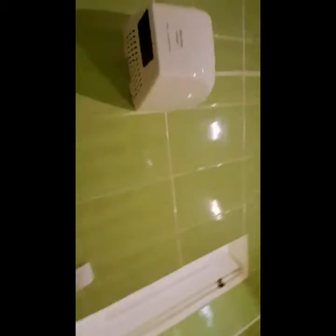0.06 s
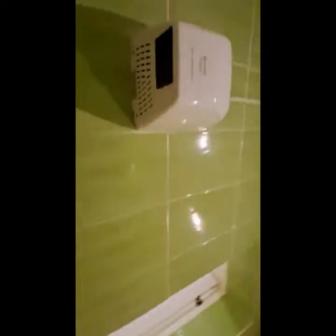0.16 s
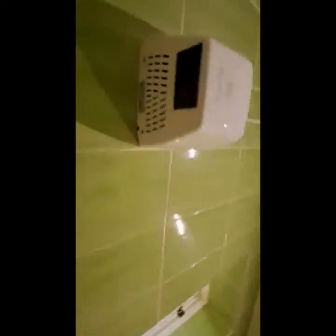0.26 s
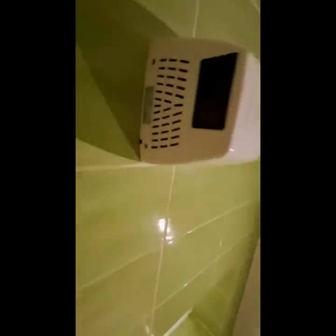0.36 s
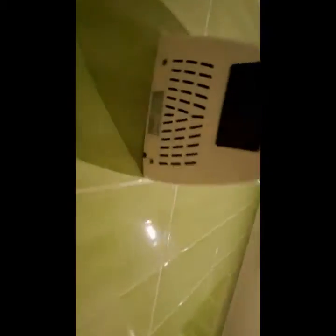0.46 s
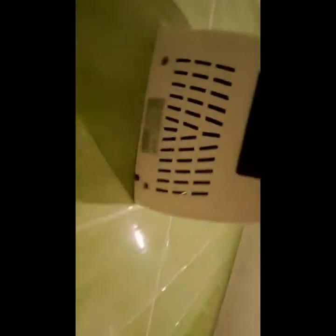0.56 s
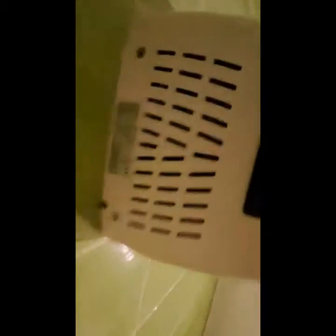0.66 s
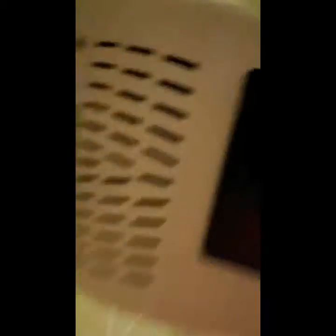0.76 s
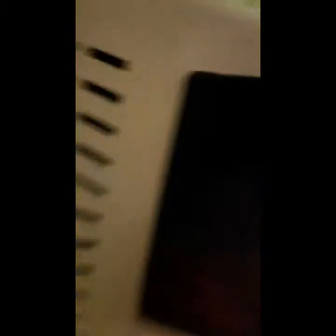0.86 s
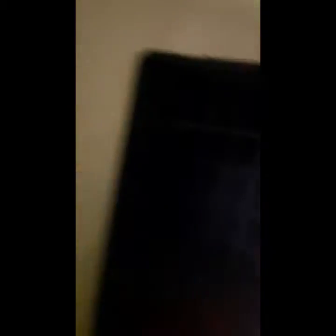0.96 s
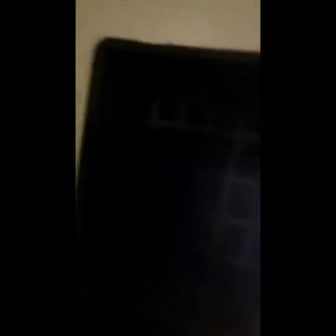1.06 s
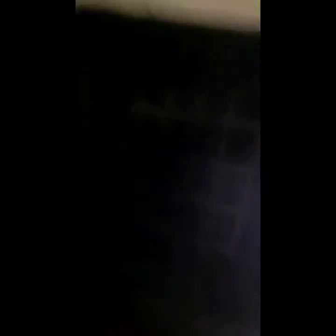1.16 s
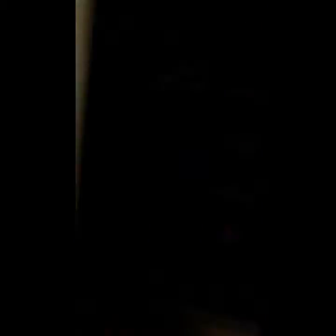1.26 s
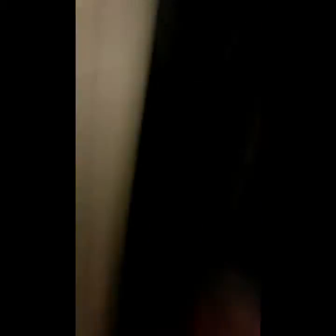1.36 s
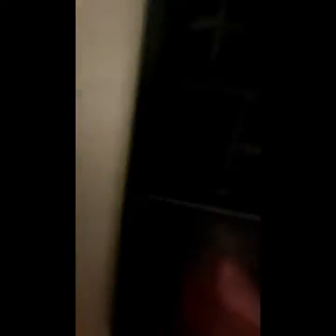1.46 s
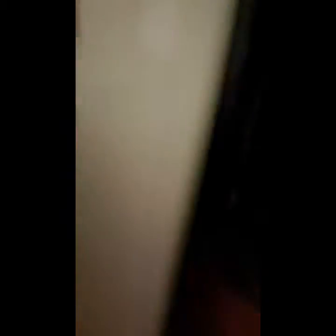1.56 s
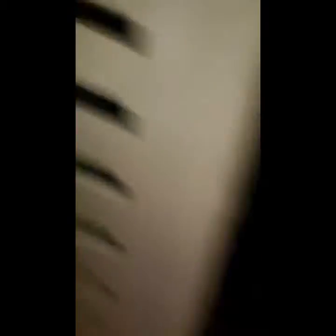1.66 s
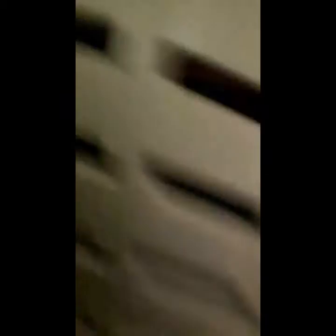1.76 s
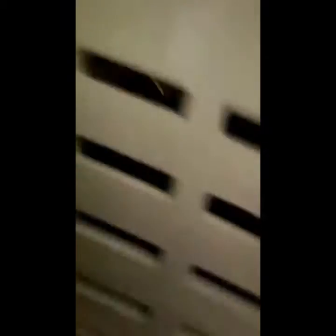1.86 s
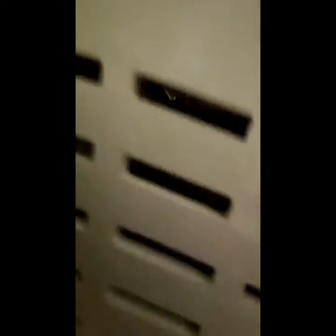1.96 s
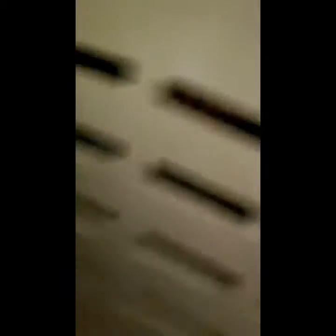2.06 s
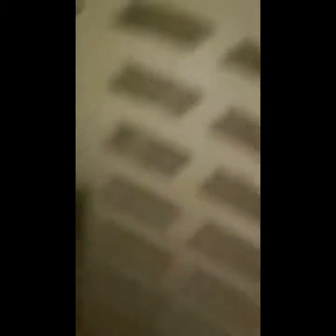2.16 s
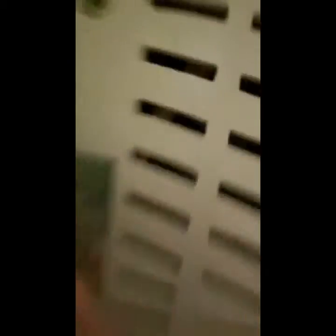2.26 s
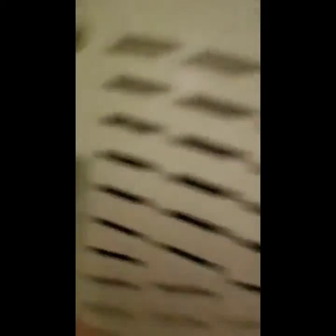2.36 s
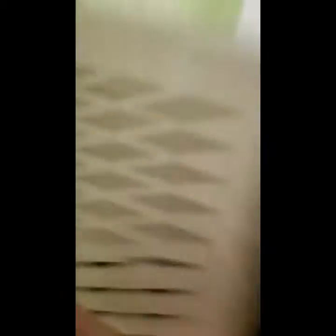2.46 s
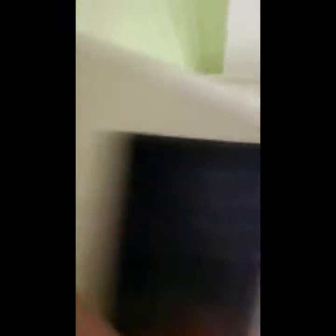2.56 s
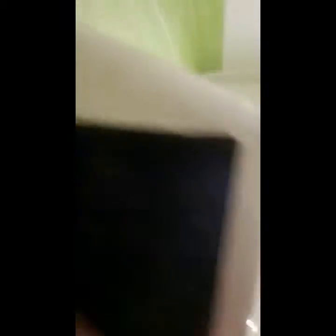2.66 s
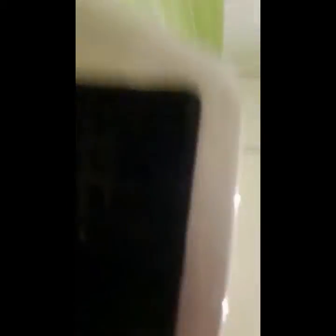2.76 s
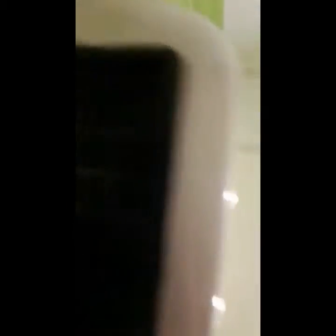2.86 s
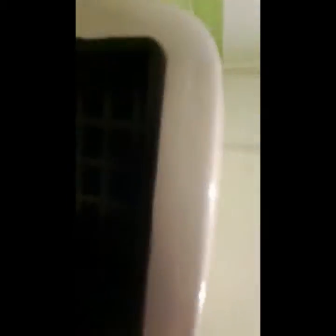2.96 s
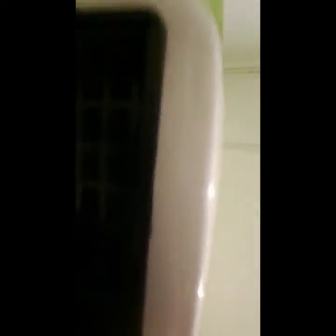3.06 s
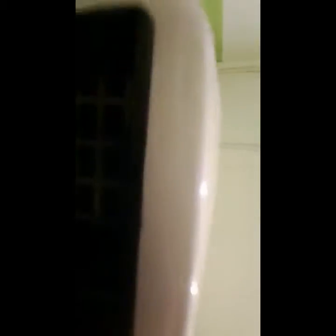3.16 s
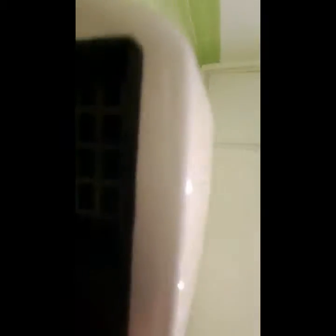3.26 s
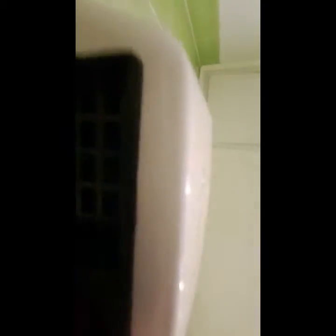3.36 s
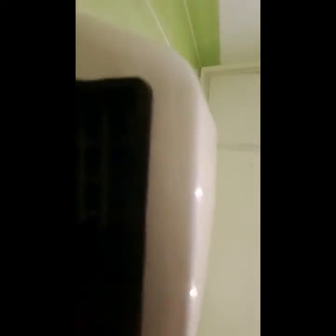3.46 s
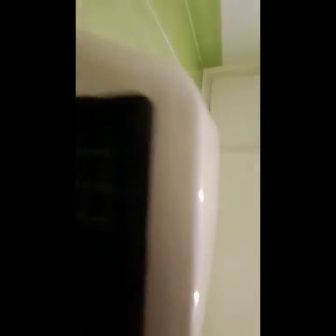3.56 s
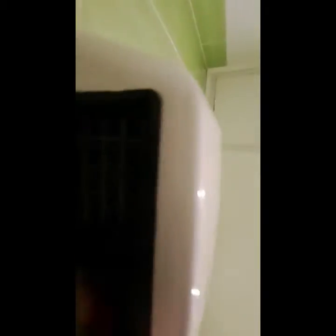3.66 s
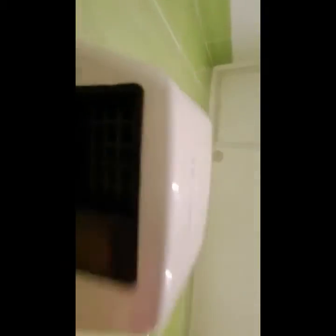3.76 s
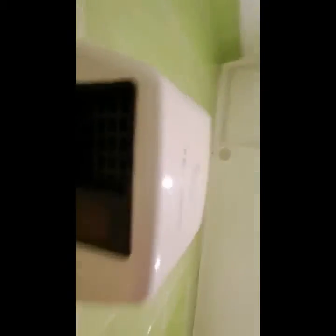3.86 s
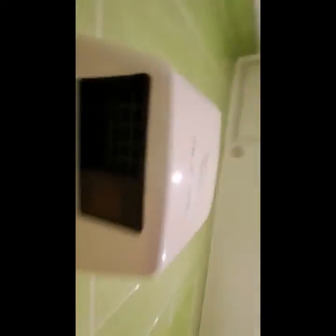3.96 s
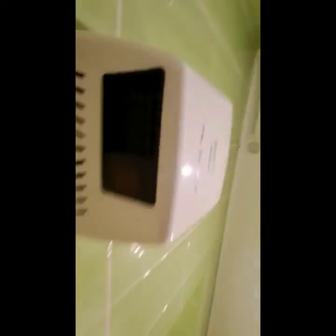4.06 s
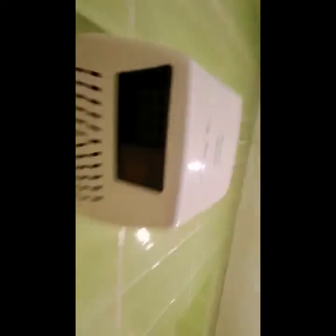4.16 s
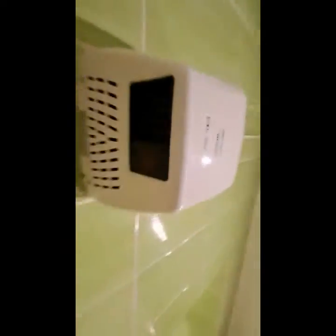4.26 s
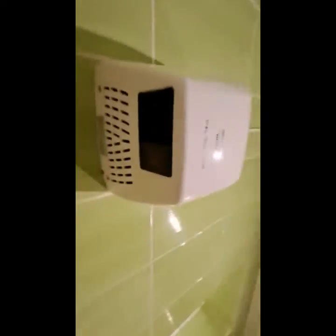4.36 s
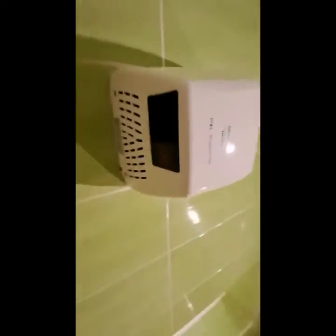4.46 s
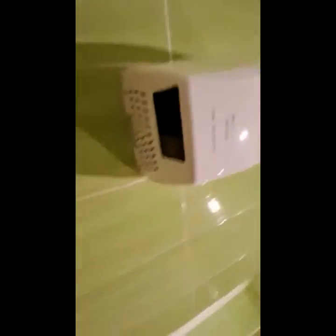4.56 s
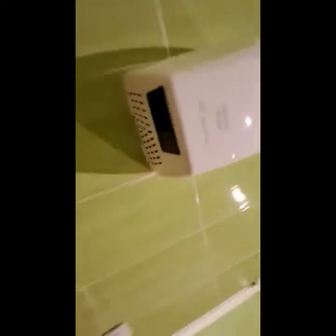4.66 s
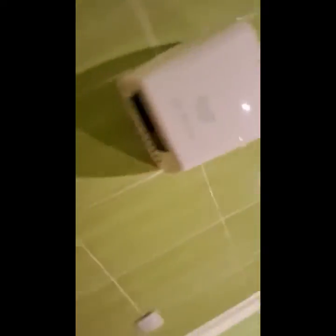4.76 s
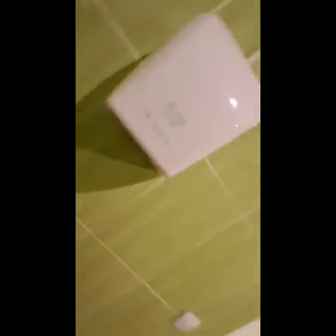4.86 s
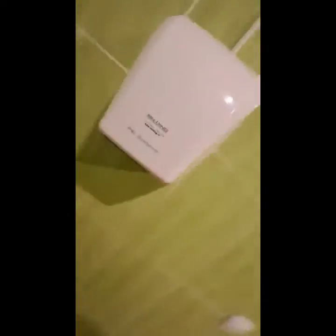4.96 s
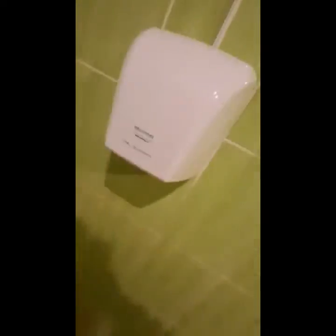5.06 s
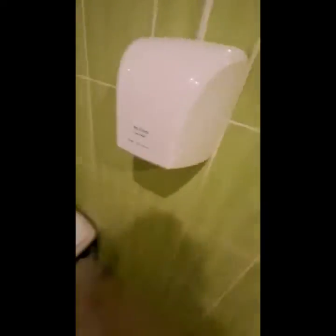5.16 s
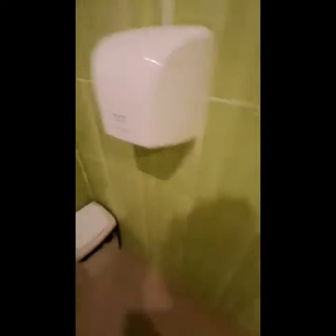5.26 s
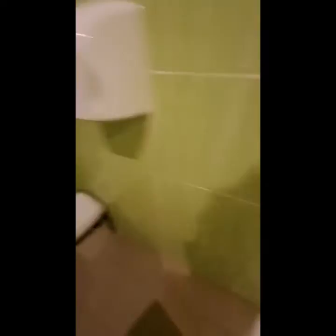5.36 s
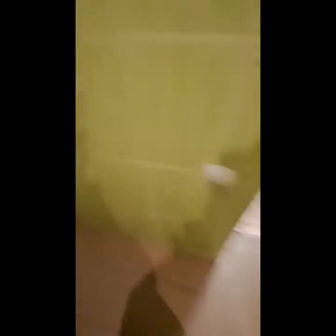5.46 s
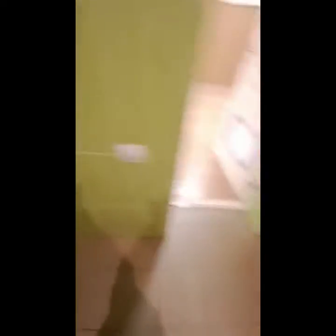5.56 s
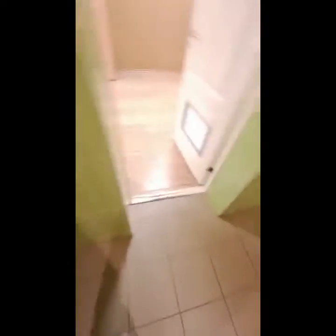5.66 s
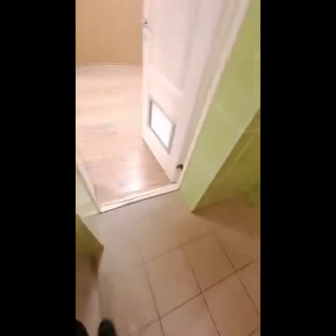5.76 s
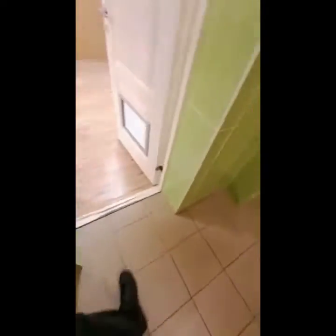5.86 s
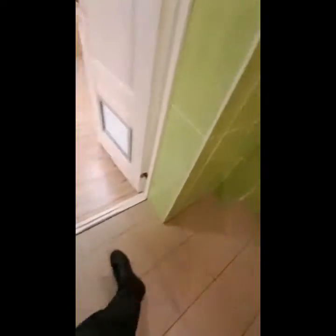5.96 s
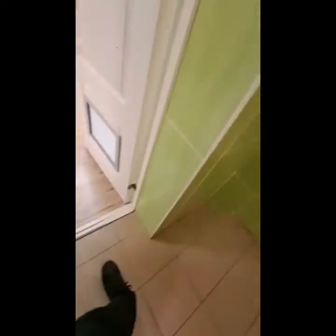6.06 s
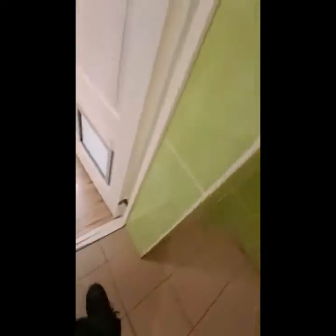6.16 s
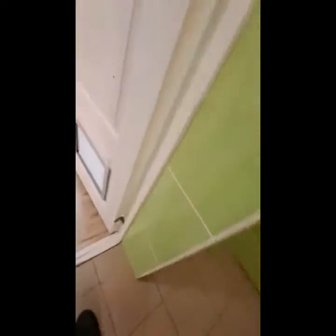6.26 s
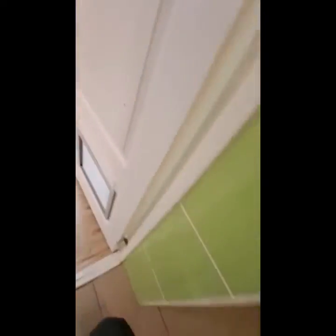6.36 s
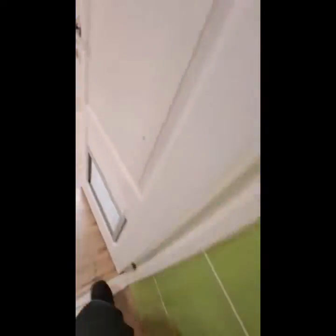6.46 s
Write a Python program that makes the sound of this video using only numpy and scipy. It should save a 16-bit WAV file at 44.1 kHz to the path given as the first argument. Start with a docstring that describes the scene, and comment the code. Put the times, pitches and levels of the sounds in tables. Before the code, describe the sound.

After a few steps, a shoe squeak and knocks on its case, a wall hand dryer starts abruptly and blows with a humming, whistling rush.

```python
"""A wall hand dryer blows: turbulent air, coloured by resonances of room and dryer, rushes over a beating
motor hum and a blade whistle, swelling and fading as the listener turns towards the door.
Beforehand someone steps up to it: sleeves rustle by friction, a sole squeaks by stick-slip, and knocks
ring the modes of the plastic case. The switch snaps and the jet briefly buffets the microphone.
The washroom's tiles add reverberation, and the building drones faintly underneath."""
import sys
import numpy as np
from scipy import signal
from scipy.fft import rfft, irfft
from scipy.io import wavfile
from scipy.ndimage import uniform_filter1d

SR = 44100
rng = np.random.default_rng(int(sys.argv[2]) if len(sys.argv) > 2 else 0)


def unload_wav(signal):
    """Save mono or channel-first audio to the path in sys.argv[1] as 16-bit WAV at rate SR, clipped to [-1, 1]."""
    wavfile.write(
        sys.argv[1],
        SR,
        np.round(np.clip(np.atleast_2d(signal).T, -1, 1) * 32767).astype(np.int16),
    )


N = 287532
T = np.arange(N) / SR
FREQS = np.fft.rfftfreq(N, 1 / SR)
ON_S = 3.490  # the dryer starts


def gain_of(db):
    """Amplitude ratio of a level in decibels."""
    return 10 ** (np.asarray(db) / 20)


def unit_rms(x):
    """Normalisation to rms 1."""
    return x / np.sqrt(np.mean(x ** 2) + 1e-20)


def read(points, hz):
    """Interpolation of a table on a log-frequency axis."""
    f, value = np.transpose(points)
    return np.interp(np.log(hz + 1), np.log(f + 1), value)


def follow(rows):
    """Linear interpolation in time of each column of a table."""
    s, *columns = np.transpose(rows)
    return [np.interp(T, s, c) for c in columns]


def since(s):
    """Time elapsed since s, zero before it."""
    return np.maximum(T - s, 0)


def add(mix, s, sound):
    """Superposition of a sound starting at time s."""
    part = mix[..., round(s * SR):][..., :sound.shape[-1]]
    part += sound[..., :part.shape[-1]]


def delayed(x, seconds):
    """Propagation delay, which may glide."""
    fine = signal.resample_poly(x, 4, 1)
    return np.interp(T - seconds, np.arange(len(fine)) / (4 * SR), fine)


def drift(bandwidth_hz):
    """Low-pass random fluctuation of rms 1."""
    return unit_rms(irfft(rfft(rng.standard_normal(N)) * np.exp(-(FREQS / bandwidth_hz) ** 2), N))


def steadied(x, window_s):
    """Division by the running rms removes slow swells and keeps the fine grain."""
    size = round(window_s * SR)
    power = uniform_filter1d(uniform_filter1d(x ** 2, size), size)
    return unit_rms(x / np.sqrt(abs(power) + 1e-9))


def pan(left_db):
    """Constant-power gains for a left-right level difference."""
    pair = np.array([gain_of(left_db / 2), gain_of(-left_db / 2)]).reshape(2, -1)
    return pair / np.sqrt(np.mean(pair ** 2, axis=0))


def click(colour_db, size=2048):
    """Minimum-phase pulse of a given spectrum, with peak 1."""
    log_gain = np.log(gain_of(colour_db(abs(np.fft.fftfreq(size, 1 / SR)))))
    pulse = np.fft.ifft(np.exp(np.conj(signal.hilbert(log_gain)))).real
    return pulse / abs(pulse).max()


# likeness of the sound at the microphone's two ports: (f/Hz, correlation)
COHERENCE = [(60, 0.82), (130, 0.69), (290, 0.96), (640, 0.39), (1410, -0.17), (3100, 0.011),
             (6820, -0.019), (15000, 0.032)]
def noise(colour_db, likeness=1):
    """Partly coherent stereo noise of rms 1: long waves reach both ports alike."""
    left, other = rfft(rng.standard_normal((2, N)))
    same = np.clip(likeness * read(COHERENCE, FREQS), -1, 1)
    right = same * left + np.sqrt(1 - same ** 2) * other
    return unit_rms(irfft(np.array([left, right]) * gain_of(colour_db(FREQS)), N))


def shaped_noise(spectrum, likeness=1):
    """Stereo noise filtered by a table of (f/Hz, relative level/dB)."""
    return noise(lambda hz: read(spectrum, hz), likeness)


# reverberation time of the tiled room: (f/Hz, T60/s)
ROOM_T60 = [(100, 0.8), (300, 0.54), (1000, 0.59), (2600, 0.56), (6000, 0.35), (15000, 0.32)]
def reverb(x, build_s=0.008):
    """Diffuse reflections off the tiles decay exponentially, each band at its own rate."""
    hz, t, bands = signal.stft(noise(np.zeros_like)[:, :SR], SR, nperseg=256)
    decay = gain_of(-60 * t / read(ROOM_T60, hz)[:, None])
    tail = signal.istft(bands * decay, SR, nperseg=256)[1]
    tail *= np.clip(np.arange(tail.shape[1]) / SR / build_s, 0, 1) ** 2
    return signal.fftconvolve(x[None], tail / np.linalg.norm(tail[0]), axes=1)[:, :N]


# spectrum of the building's drone: (f/Hz, level/dB)
DRONE_SPECTRUM = [(15, -52), (25, -22.5), (87, 5.5), (105, 1), (124, -35), (160, 5.5), (189, -14),
                  (271, -14), (297, -28), (372, -15.5), (432, -27), (472, -13.5), (583, -55), (900, -37),
                  (1170, -52), (1980, -120)]
def room_tone(db=-51.5):
    """Room resonance: a low drone of the building stands between the walls."""
    return gain_of(db) * shaped_noise(DRONE_SPECTRUM, likeness=1.19)


# shifts of the hand: (t/s, level/dB, duration/s)
HAND_SHIFTS = [(0.08, -45, 0.13), (0.73, -53, 0.16), (1.615, -43.5, 0.178), (2.253, -53, 0.17),
               (3.573, -38, 0.041), (3.98, -52, 0.23), (5.326, -39, 0.28), (6.298, -41, 0.29)]
def handling(low_hz=32, high_hz=75):
    """Structure-borne sound: a hand on the microphone's housing makes a soft rumble."""
    level = np.zeros(N)
    for s, db, length in HAND_SHIFTS:
        add(level, s, gain_of(db) * signal.windows.tukey(round(length * SR), .6))
    rumble = noise(lambda hz: -10 * np.log10((1 + (hz / high_hz) ** 6) * (1 + (low_hz / (hz + 1)) ** 4)))
    return level * steadied(rumble, .12)


# strokes of sleeves and trousers: (peak t/s, half-width/s, swish level/dB, fizz level/dB)
CLOTH_STROKES = [(0.1, 0.051, -54.5, -65), (0.26, 0.096, -50.5, -58.5), (0.692, 0.26, -52, -58.5),
                 (1.184, 0.064, -56, -77), (1.256, 0.056, -54.5, -57), (1.507, 0.1, -57.5, -65),
                 (1.85, 0.15, -53, -60), (2.1, 0.033, -58, -57), (2.288, 0.14, -61, -65),
                 (2.73, 0.02, -69, -69), (2.822, 0.075, -55.5, -83), (2.918, 0.035, -56, -60.5),
                 (3.02, 0.082, -58, -71), (3.262, 0.097, -58, -76)]
# spectra of the soft swish and the crisp fizz: (f/Hz, level/dB)
SWISH_SPECTRUM = [(200, 4.5), (450, 1), (900, -7.5), (1600, -5.5), (3000, -8.5), (5000, -10), (8000, -21),
                  (16000, -56)]
FIZZ_SPECTRUM = [(2000, -43), (5000, -10), (7000, 2.5), (10000, -2.5), (12500, -1), (16000, -4.5)]
def clothes(rest_swish_db=-66, rest_fizz_db=-75.5, grain_db=1.0):
    """Sliding friction of cloth on cloth: noise follows the speed, and strokes add in power."""
    swish_power, fizz_power = gain_of(rest_swish_db) ** 2, gain_of(rest_fizz_db) ** 2
    for s, width, swish_db, fizz_db in CLOTH_STROKES:
        speed = np.exp(-((T - s) / width) ** 2 / 2)
        swish_power += (gain_of(swish_db) * speed) ** 2
        fizz_power += (gain_of(fizz_db) * speed) ** 2
    swish = np.sqrt(swish_power) * shaped_noise(SWISH_SPECTRUM)
    fizz = np.sqrt(fizz_power) * shaped_noise(FIZZ_SPECTRUM) * pan(2.5)
    return (swish + fizz) * gain_of(grain_db * drift(91))


# a sleeve touches the case: (t/s, level/dB, decay time/s)
SLEEVE_BRUSHES = [(2.04, -39.5, 0.08), (2.204, -44, 0.021)]
def brushes():
    """Friction noise starts abruptly as cloth catches on plastic and decays as it slides off."""
    level = sum(gain_of(db) * (T > s) * np.exp(-abs(T - s) / decay) for s, db, decay in SLEEVE_BRUSHES)
    spectrum = [(200, 2.5), (900, -1.0), (1600, -9.5), (4800, -9.0), (8000, -21.5), (16000, -16.5)]
    return level * shaped_noise(spectrum)


# footfalls on tile: (t/s, level/dB, relative boom/dB, frequency ratio, slap lift/dB, roll time/s)
FOOTFALLS = [(0.158, -34.5, -3.5, 1.9, 5, .007), (0.605, -29.5, -14, 1.44, -7, 0.0031),
             (0.745, -40.5, -5, 1.6, 6, 0.017), (1.157, -40.5, -6, 1.34, 7, 0.0067),
             (1.409, -46, -13, 1.75, 4.5, .028), (1.774, -22, -17, 1.06, -0.5, .006),
             (1.81, -29, -19, .9, -8, 0.0042), (3.025, -45.5, -9, 1.14, -6, 0.0066),
             (3.156, -36, 7, 1.24, 6, 0.026)]
# spectrum of the heel's impact: (f/Hz, level/dB)
HEEL_SPECTRUM = [(30, -40.5), (75, -19.5), (125, -3), (165, -1), (205, 0), (275, 8), (420, -11.5),
                 (650, -19), (1200, -27.5), (1650, -29), (4000, -39), (16000, -48)]
# band of the sole's slap: (f/Hz, share of the lift)
SLAP_BAND = [(550, 0.055), (850, 1), (1300, 0.8), (2500, 0.022)]
# standing waves between the walls: (f/Hz, level/dB, T60/s)
ROOM_MODES = [(84, -9, 0.8), (152.5, -5, 0.57), (269, -1, 0.4), (349, -14, 0.41), (421, -9, 0.4),
              (600, -27, 0.34), (870, -22, 0.36), (1090, -20.5, .3)]
def steps(direct_db=-3, room_db=-2, tap_db=-7, boom_rise_s=0.036):
    """Impact excitation: the heel taps, the sole rolls down in a thud, and the room's modes boom."""
    thuds, boom, t = np.zeros(N), np.zeros(N), np.arange(SR // 2) / SR
    modes = sum(gain_of(db - 60 * t / t60) * np.sin(2 * np.pi * hz * t) for hz, db, t60 in ROOM_MODES)
    modes *= 1 - np.exp(-t / boom_rise_s)
    for s, db, boom_db, pitch, slap_db, roll_s in FOOTFALLS:
        heel = click(lambda hz: read(HEEL_SPECTRUM, hz / pitch) + slap_db * read(SLAP_BAND, hz))
        scuff = signal.fftconvolve(rng.standard_normal(len(t) + len(heel) - 1), heel, "valid")
        thud = steadied(scuff, .012) * t * np.exp(-t / roll_s)
        add(thuds, s, gain_of(db) * thud / abs(thud).max())
        add(thuds, s, gain_of(db + tap_db) * heel)
        add(boom, s, gain_of(db + boom_db) * modes)
    return gain_of(direct_db) * thuds + gain_of(room_db) * reverb(thuds) + boom


# chirps of a rubber sole: (t/s, level/dB, f/Hz, duration/s)
SOLE_SQUEAKS = [(0.636, -22, 2570, 0.0206), (0.639, -39.5, 2980, 0.0113)]
def squeaks(glide=0.032, rasp=0.025, octave_db=-13.5, decay_s=0.013, chatter_db=1.0, room_db=1):
    """Stick-slip oscillation of rubber, uneven and sagging in pitch; the room repeats the chirp."""
    dry = np.zeros(N)
    for s, db, hz, length in SOLE_SQUEAKS:
        n = round(length * SR)
        pitch = hz * (1 - glide * np.linspace(-1, 1, n) + rasp * drift(510)[:n])
        phase = 2 * np.pi * np.cumsum(pitch) / SR
        grip = signal.windows.tukey(n, .16) * np.exp(-np.arange(n) / SR / decay_s)
        grip *= unit_rms(gain_of(chatter_db * drift(190)[:n]))
        chirp = gain_of(db) * (np.sin(phase) + gain_of(octave_db) * np.sin(2 * phase)) * grip
        for delay_s, path_db in [(0, -1), (.064, -19)]:
            add(dry, s + delay_s, gain_of(path_db) * chirp)
    return np.array([delayed(dry, .00009), dry]) + gain_of(room_db) * reverb(dry)


# blows on the case: (t/s, level/dB, body lift/dB, treble tilt/(dB/octave), skin frequency ratio)
CASE_KNOCKS = [(1.773, -42, -7, -0.5, .96), (1.888, -22, -3, -4, 1.03), (1.898, -39, 0, -5, 1.04),
               (1.9136, -36, -10, -5.5, 0.98), (2.2165, -42.5, 5, -4, 0.96), (2.2396, -17, 1, 3, 0.99),
               (2.2502, -32, 10.5, -13, 1.02), (2.417, -35, -3, -6, 0.96)]
# modes of the hollow body (low, long) and the plastic skin (high, brief): (f/Hz, level/dB, T60/s)
CASE_MODES = [(62, -16, 0.37), (116, -12.5, 0.14), (154, -16, 0.36), (230, -5, 0.16), (260, -7.5, 0.13),
              (291.7, -10.5, 0.16), (370, -7, 0.16), (486, -0.5, 0.026), (574, -9, 0.088),
              (652, -19.5, 0.16), (777, -22, 0.112), (1077, -1, 0.028), (1500, -10, 0.012),
              (1720, 5, 0.0067), (2200, 4, 0.0153), (2680, 6, 0.005), (2920, -6.5, 0.012), (3310, 4, 0.011),
              (4900, -5, 0.0044), (7300, -1, 0.0073), (8070, -3, 0.0048), (10560, -2, 0.0031),
              (13100, -1, 0.0017)]
# spectrum of the loose cover: (f/Hz, level/dB)
RATTLE_SPECTRUM = [(400, -14.5), (1100, -1), (2300, 0), (4000, -9.5), (10000, -27.5)]
def knocks(crack_db=-13, crack_s=0.0049, rattle_db=-21, rattle_s=.016, swell_s=0.0007):
    """Modal ringing: a hard contact cracks, rattles the cover and excites the case's damped modes."""
    body, skin, crack, t = np.zeros(N), np.zeros((2, N)), np.zeros(N), np.arange(SR // 2) / SR
    cover = click(lambda hz: read(RATTLE_SPECTRUM, hz))
    for s, db, body_db, tilt_db, spot in CASE_KNOCKS:
        contact = click(lambda hz: (tilt_db - 13.0) * np.log2(1 + hz / 3000))
        burst = signal.fftconvolve(rng.standard_normal(len(t)) * np.exp(-t / crack_s), contact)
        add(crack, s, gain_of(db + crack_db) * burst)
        rattle = signal.fftconvolve(rng.standard_normal(len(t)) * np.exp(-t / rattle_s), cover)
        add(crack, s, gain_of(db + rattle_db - tilt_db) * rattle / abs(rattle).max())
        for k, (hz, mode_db, t60) in enumerate(CASE_MODES):
            fading = (-1) ** k * gain_of(db + mode_db - 60 * t / t60)
            if hz < 800:
                swell = 1 - np.exp(-t / swell_s)
                add(body, s, gain_of(body_db) * fading * np.sin(2 * np.pi * hz * t) * swell)
            else:  # each port faces the skin from its own angle
                ring = np.sin(2 * np.pi * hz * spot * t + rng.uniform(-4.0, 1, (2, 1)))
                add(skin, s, gain_of(tilt_db * np.log2(hz / 2300)) * fading * ring)
    to_room = gain_of(-7) * body + gain_of(-26) * skin[0] + gain_of(-9) * crack
    return body + skin + crack + reverb(to_room)


def switch(db=-22, rise_s=0.003, hold_s=0.0068, decay_s=0.0052, room_db=-8):
    """A broadband transient: the contact closes with a short bright crackle."""
    burst = np.minimum(since(ON_S) / rise_s, 1) * np.exp(-since(ON_S + hold_s) / decay_s)
    spectrum = [(300, -0.5), (950, -5), (1250, 15), (1600, -0.5), (2200, 12.0), (3200, -6.5),
                (7000, 1.5), (9000, 1), (9900, 7), (10800, -8), (12500, 0), (16000, -9)]
    crackle = gain_of(db) * burst * shaped_noise(spectrum)
    return crackle * pan(3.1) + gain_of(room_db) * reverb(crackle[1])


# spectrum of the jet's roar: (f/Hz, level/dB)
ROAR_SPECTRUM = [(100, -53), (240, -11), (380, 8), (600, 3.5), (900, 1), (1400, -8), (2500, -14),
                 (4500, -46), (8000, -34), (16000, -75)]
def eddies(core, dull_hz=650, spit_db=-16, spit_gust_db=8.0, gust_db=1.9):
    """Turbulent pressure is dull outside the jet's core; inside, eddies tear at the port and spit."""
    slow = noise(lambda hz: read(ROAR_SPECTRUM, hz) - 10 * np.log10(1 + (hz / dull_hz) ** 2))
    fast = steadied(shaped_noise(ROAR_SPECTRUM, likeness=0.13), 0.025)
    spit = shaped_noise([(500, -16), (1800, 6.0), (4500, 2.5), (8000, -9), (16000, -45)])
    spit *= gain_of(spit_db) * unit_rms(gain_of(spit_gust_db * np.tanh(drift(140))))
    return (np.sqrt(1 - core) * slow + np.sqrt(core) * (fast + spit)) * gain_of(gust_db * drift(130))


# spectrum of the jet's dull push: (f/Hz, level/dB)
BUFFET_SPECTRUM = [(20, -26), (55, -15.5), (92, 2), (155, -8), (220, -6), (330, -5.5), (600, -28),
                   (2000, -68)]
# surges and lulls of the jet's core: (t/s, lift/dB)
CORE_SURGES = [(3.612, 3), (3.657, -4), (3.711, 1.5), (3.803, 1.5)]
def jet(core_s=3.584, cross_s=0.049, graze_s=0.02, leave_s=3.732, gone_s=4.05):
    """Wind noise: the jet pushes on both ports, then the left roars in its core, the right at its edge."""
    core = np.clip(.5 + (T - core_s) / cross_s, 0, 1)
    edge = np.clip(.5 + (T - core_s - graze_s) / cross_s, 0, 1)
    buffet_db = -14.5 - 49 * since(core_s) + np.outer([1, 0], -28 * core)
    buffet = gain_of(buffet_db) * np.minimum(since(ON_S) / 0.065, 1) ** 0.71
    buffet *= steadied(shaped_noise(BUFFET_SPECTRUM), .018)
    surge_db = sum(db * np.exp(-((T - s) / .025) ** 2) for s, db in CORE_SURGES)
    right_db = np.outer([0, 1], -8 * (core - edge) - 17.5 * edge)
    roar_db = -12 + surge_db - 17 * (1 - core) + right_db - 90 * since(leave_s)
    roar = gain_of(roar_db) * np.minimum(since(ON_S) / 0.022, 1) * eddies(core)
    return (buffet + roar) * np.clip((gone_s - T) / 0.088, 0, 1)


def spin_up(lag_s=0.11):
    """First-order lag: the share of full air flow as the fan gathers speed."""
    return 1 - np.exp(-since(ON_S) / lag_s)


def beam(back_off_s=3.97, db_per_s2=12.5):
    """Directivity: the outlet's gain falls from 1 to 0 as the listener backs out of its beam."""
    return gain_of(-db_per_s2 * since(back_off_s) ** 2)


# the air flow at the moving listener: (t/s, body level/dB, rush level/dB, hiss level/dB)
FLOW_LEVELS = [(3.93, -36.5, -32.5, -37), (4.02, -33, -33, -36.5), (4.28, -33, -33.5, -39),
               (4.7, -35.5, -35, -41.5), (5.05, -36.5, -36.5, -44.5), (5.26, -35, -34.5, -42),
               (5.38, -30.5, -31, -38), (5.74, -23.5, -26.5, -35), (5.91, -23.5, -28.5, -34.5),
               (6.1, -27.5, -30.5, -39.5), (6.42, -31, -34, -43)]
def flow_levels():
    """Body, rush and hiss travel by different paths, so each has its own level curve."""
    return follow(FLOW_LEVELS)


# the alcove's roar as the listener turns away: (t/s, level/dB)
ALCOVE_LEVELS = [(4.0, -47), (4.9, -42), (5.3, -43), (5.85, -28.5), (6.15, -37), (6.45, -42)]
def alcove(centre_hz=850, width_hz=130, gust_db=1.5):
    """Resonance of the alcove, driven unevenly by the rush, gives a hollow roar."""
    band = noise(lambda hz: -20 * np.log10(1 + (2 * (hz - centre_hz) / width_hz) ** 2))
    return gain_of(follow(ALCOVE_LEVELS)[0] + gust_db * drift(17)) * band * spin_up()


# the grille's sizzle, loudest in line with the slots: (t/s, level/dB)
SIZZLE_LEVELS = [(3.7, -51), (4.03, -40), (4.35, -46.5), (5.2, -54), (5.35, -46), (5.8, -41), (6.08, -44.5),
                 (6.28, -72)]
# its spectrum, peaking near 12 kHz: (f/Hz, level/dB)
SIZZLE_SPECTRUM = [(8500, -18), (10500, -8), (11700, -3), (12400, -8), (13600, -14), (14800, -8),
                   (16000, -27)]
def grille():
    """Flow noise: air tears along the slots in a thin, narrowly aimed sizzle."""
    return gain_of(follow(SIZZLE_LEVELS)[0]) * shaped_noise(SIZZLE_SPECTRUM) * spin_up()


# the listener passes through the whistle's standing waves: (t/s, level/dB re the rush)
WHISTLE_LEVELS = [(3.8, -24), (4.0, -10), (4.12, -1), (4.25, -0.5), (4.62, -6.5), (4.79, 2), (4.92, -7),
                  (5.02, -7), (5.16, -0.5), (5.4, -12), (5.51, 3), (5.62, -15), (5.78, 3), (5.88, -13),
                  (6.0, -0.5), (6.09, -14), (6.15, -2), (6.26, -20), (6.4, 1), (6.5, -21)]
def whistle(blade_phase, wobble_rad=0.48, octave_db=-25, near_scatter=0.32, far_scatter=0.99):
    """The blade-passing tone is pure nearby and flutters via the walls; turbulence adds an airy band."""
    def scattered(rate_hz):
        ears = [drift(rate_hz) * np.sin(blade_phase) + drift(rate_hz) * np.cos(blade_phase)
                for _ in range(2)]
        return np.array([steadied(ear, .15) for ear in ears])
    shaken = blade_phase + wobble_rad * drift(27.6)
    direct = unit_rms(np.sin(shaken) + gain_of(octave_db) * np.sin(2 * shaken))
    share = np.clip(far_scatter + (near_scatter - far_scatter) * beam(), 0, 1)
    tone = np.sqrt(1 - share) * direct + np.sqrt(share) * scattered(rate_hz=20)
    airy = gain_of(-9 + 4 * beam()) * scattered(rate_hz=125)
    return gain_of(flow_levels()[1]) * (gain_of(follow(WHISTLE_LEVELS)[0]) * tone + airy)


# the hum as the listener leaves the wall: (t/s, mains level/dB, rotor level/dB)
HUM_LEVELS = [(4.2, -49, -51), (5.2, -76, -39), (5.55, -40.5, -34.5), (6.45, -40.5, -36.5)]
def motor(mains_hum_hz=100.0, rotor_hz=111.2, blades=24, slip=0.33, catch_up_s=.19, pulsing=0.26):
    """Beats arise between mains hum and rotor hum; the rotor speeds up and carries the whistle with it."""
    mains_db, rotor_db = follow(HUM_LEVELS)
    mains = 2 * np.pi * mains_hum_hz * T
    speed = (1 - slip * np.exp(-since(ON_S) / catch_up_s)) * (1 + 0.00115 * drift(4.8))
    rotor = 2 * np.pi * np.cumsum(rotor_hz * speed) / SR
    hum = gain_of(mains_db) * (np.sin(mains) + gain_of(-4) * np.sin(2 * mains))
    hum += gain_of(rotor_db) * (np.sin(rotor) + gain_of(-8) * np.sin(2 * rotor))
    hum += gain_of((mains_db + rotor_db) / 2 - 5) * np.sin(mains + rotor)  # sum tone
    torque_ripple = 1 + pulsing * np.sin(mains)
    return (np.sqrt(2) * hum * pan(2.6) + whistle(blades * rotor) * torque_ripple) * spin_up()


# spectrum of the turbulent air: (f/Hz, level/dB)
AIR_SPECTRUM = [(18, -45), (30, -39), (70, -23.5), (105, -17), (150, -19.5), (210, -13), (490, -15),
                (840, -13.5), (1000, -16), (2400, -12.5), (3000, -15.5), (4800, -19.5), (11700, -22.5),
                (16000, -30)]
# narrow tones of the tiled room and broader resonances of the dryer: (f/Hz, width/Hz, lift/dB)
AIR_RESONANCES = [(207, 13, 0.5), (250, 19, -1.5), (283, 21, 5.5), (326.7, 33, 7), (372, 10, 5.5),
                  (439, 15, -2), (494, 48.3, -2.5), (560, 18, -0.5), (690, 230, 1.5), (1120, 300, 0.5),
                  (1616, 390, 4.5), (2030, 240, 3), (3500, 770, -1), (11500, 850, 2.5)]
def air_band(level_db, low_hz, high_hz, flutter_db=1.46):
    """Source and filter: a fluttering band of rushing air, coloured by resonances of room and dryer."""
    def colour(hz):
        peaks = sum(db / (1 + (2 * (hz - f) / width) ** 2) for f, width, db in AIR_RESONANCES)
        roll_off = 10 * np.log10((1 + (low_hz / (hz + 1)) ** 8) * (1 + (hz / high_hz) ** 8))
        return read(AIR_SPECTRUM, hz) + peaks - roll_off
    return gain_of(level_db + flutter_db * drift(36)) * noise(colour)


# reflections off the near walls: (delay/s, level/dB)
WALL_ECHOES = [(.0023, -24), (.0041, -34), (.0087, -18), (0.0145, -13.5)]
def wall_echoes(flow, sway_s=0.00013):
    """Comb filtering: reflections interfere with the rush, their delays gliding as the listener moves."""
    for delay_s, db in WALL_ECHOES:
        glide = delay_s + sway_s * drift(0.9)
        flow = flow + gain_of(db) * np.array([delayed(ear, glide) for ear in flow])
    return flow


# spectrum of the hiss beamed from the outlet: (f/Hz, level/dB)
OUTLET_SPECTRUM = [(1000, -4), (1850, -2), (2200, 17.5), (2500, 6.5), (2850, 18.5), (3000, 12.5),
                   (3350, 18), (3750, 13), (4100, 13.5), (4600, 7), (5700, 10), (6400, 1), (7400, -1),
                   (8800, 2), (10000, -22), (11500, -14), (16000, -31)]
# reflection off the rim of the case as the listener backs away: (t/s, delay/s)
RIM_DELAYS = [(3.85, 0.000087), (4.15, 0.00013), (4.7, 0.00015)]
def air_rush(outlet_db=-32.5, rim_db=-19.5, wet=.3, crossfeed=.25, port_lag_s=0.000306, gust_db=1.0):
    """Turbulence radiates broadband noise, heard directly and by reflection from rim, tiles and walls."""
    body_db, rush_db, hiss_db = flow_levels()
    body = air_band(body_db, 20, 1200)
    treble = air_band(rush_db, 1200, 5000) + air_band(hiss_db, 5000, 20000)
    treble += gain_of(outlet_db) * beam() * shaped_noise(OUTLET_SPECTRUM)
    rim_s = follow(RIM_DELAYS)[0]
    left, right = (ear + gain_of(rim_db) * beam() * delayed(ear, rim_s) for ear in treble)
    right = crossfeed * delayed(left, port_lag_s) + np.sqrt(1 - crossfeed ** 2) * right
    body = np.sqrt(1 - wet) * body + np.sqrt(wet) * reverb(body[0])  # the tiles pick out narrow tones
    body = gain_of(body_db) * steadied(body, 0.098) * gain_of(gust_db * drift(28.0))
    return wall_echoes(body + np.array([left, right])) * spin_up() * pan(0.59)


def scene():
    """Superposition of room, visitor and dryer."""
    visitor = clothes() + brushes() + steps() + squeaks() + knocks() + handling()
    dryer = switch() + jet() + air_rush() + alcove() + grille() + motor()
    return room_tone() + visitor + dryer


def record(dry, notch_hz=135, notch_db=-6.5, ceiling=.95, cutoff_hz=16050):
    """A bass notch, a brief fade-in, soft saturation of the strongest gusts and a low-pass filter."""
    notch = gain_of(notch_db / (1 + ((FREQS - notch_hz) / 11) ** 4))
    faded = irfft(rfft(dry) * notch, N) * np.clip(0.6 + T / 0.023, 0, 1)
    rounded = faded / (1 + (faded / ceiling) ** 4) ** .25
    low_pass = signal.firwin(511, cutoff_hz, window=("kaiser", 9), fs=SR)
    return signal.oaconvolve(rounded, low_pass[None], "same")


dry = scene()
out = record(dry)
unload_wav(out)
```